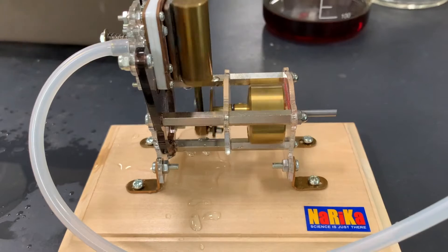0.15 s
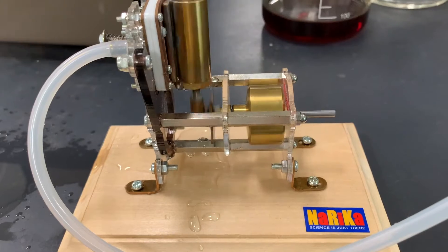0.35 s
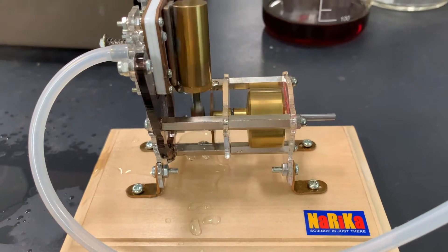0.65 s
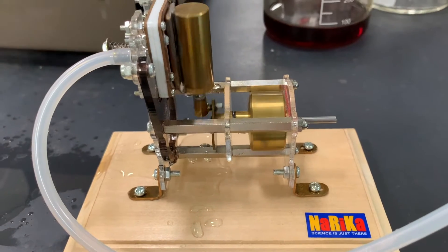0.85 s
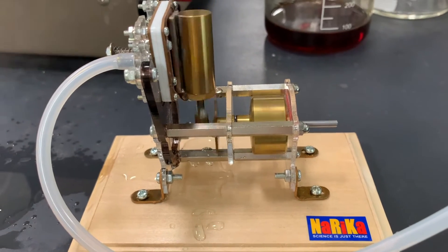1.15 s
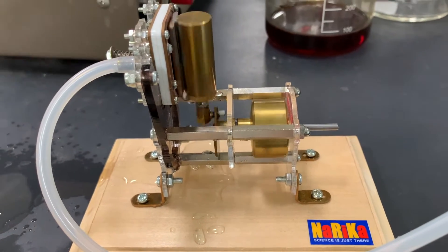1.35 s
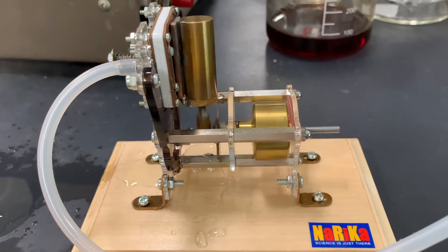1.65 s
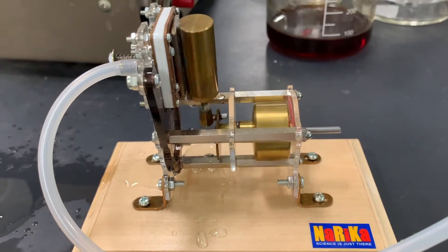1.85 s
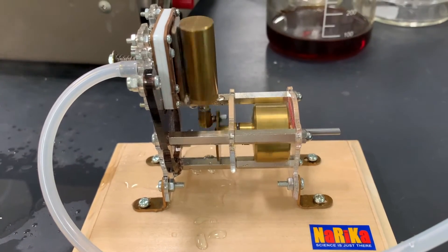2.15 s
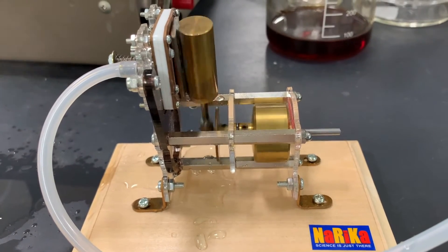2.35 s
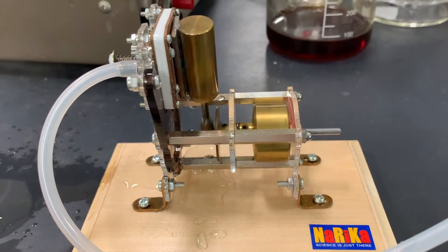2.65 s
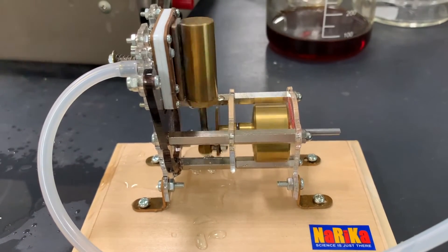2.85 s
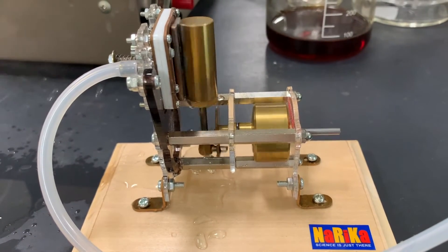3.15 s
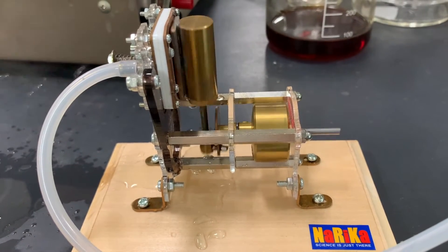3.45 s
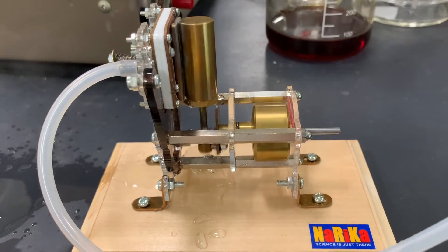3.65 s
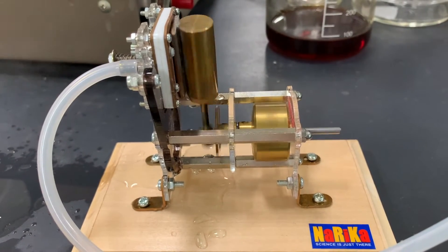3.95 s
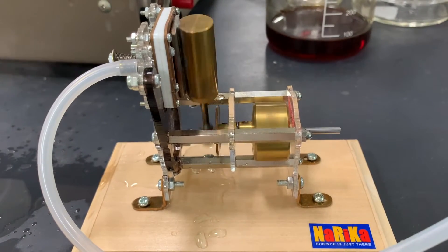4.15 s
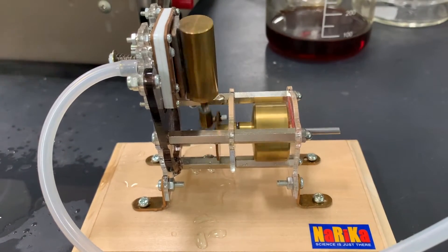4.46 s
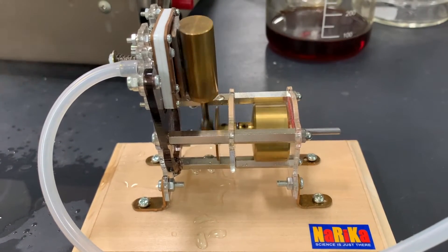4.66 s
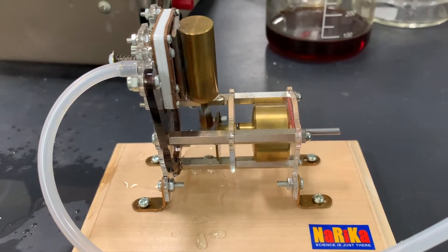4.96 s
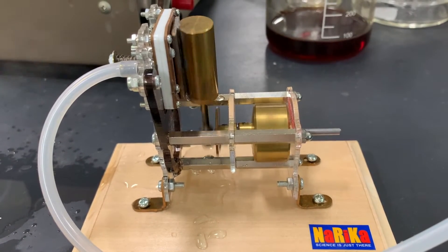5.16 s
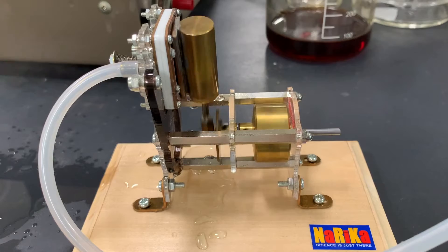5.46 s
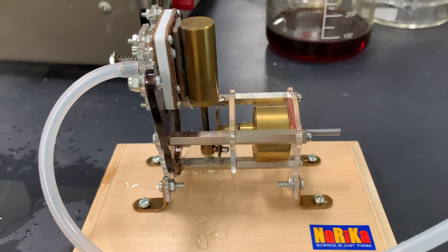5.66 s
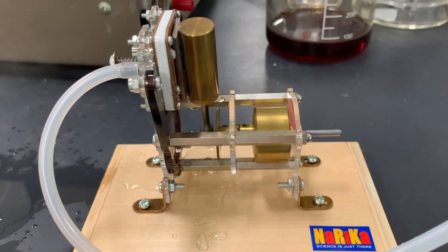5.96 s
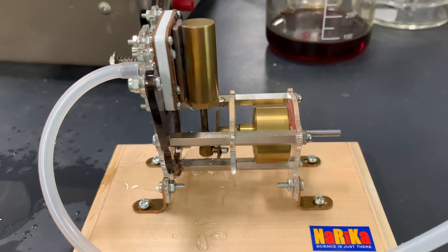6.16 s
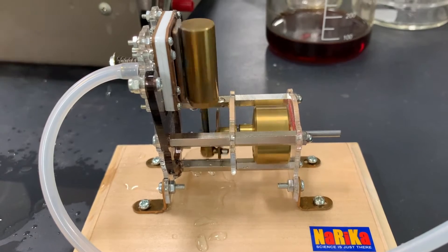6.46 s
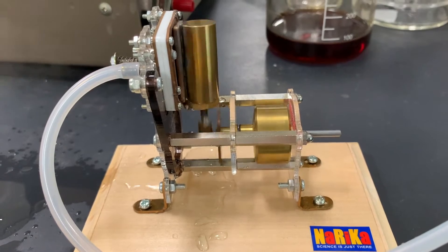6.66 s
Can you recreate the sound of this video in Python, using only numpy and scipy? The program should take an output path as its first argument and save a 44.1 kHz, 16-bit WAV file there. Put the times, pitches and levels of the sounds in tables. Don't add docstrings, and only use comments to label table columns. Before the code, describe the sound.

Steady, quick mechanical chatter from a tiny steam engine: bright metal ticks, dry low-mid knocks in frame and board, and thin whistling, spitting steam between them, alternating longer and shorter puffs. The pace stays nearly even while loudness and looseness shift from stroke to stroke. Recorded very near on a hard laboratory bench; short reflections, faint ventilation noise, no speech.

```python
import sys
import numpy as np
from scipy import signal
from scipy.fft import rfft, irfft
from scipy.io import wavfile
from scipy.ndimage import uniform_filter1d, map_coordinates

SR = 44100
rng = np.random.default_rng(int(sys.argv[2]) if len(sys.argv) > 2 else 0)


def attenuation_scalar(level_db):
    decades = np.asarray(level_db, float) / 20
    return 10 ** decades


def generate_wav(sig):
    pcm = np.round(np.clip(np.atleast_2d(sig).T, -1, 1) * 32767).astype(np.int16)
    wavfile.write(sys.argv[1], SR, pcm)


N = 300762
LEAD = SR // 10


def noise(*shape):
    return rng.standard_normal(shape)


def unit(x):
    return x / np.sqrt(np.mean(x ** 2))


def add(track, s, sound):
    i = LEAD + int(s * SR)
    track[..., i:i + sound.shape[-1]] += sound[..., :track.shape[-1] - i]


def walk(rate):
    k = int(SR / rate)
    steps = np.repeat(noise((N + LEAD) // k + 1), k)
    return uniform_filter1d(steps, k)[:N + LEAD]


def resonate(x, peaks, patchy_db=0):
    total = 0
    for hz, width, db in peaks:
        edges = [hz - width / 2, hz + width / 2]
        band = signal.sosfilt(signal.butter(2, edges, "band", fs=SR, output="sos"), x)
        total = total + band * attenuation_scalar(db + patchy_db * walk(30))
    return total


def ports(x, lag, unlike):
    n = x.shape[1]
    delay = np.exp(-2j * np.pi * np.arange(n // 2 + 1) / n * lag)
    left, right = x[0] + unlike * x[1], x[0] - unlike * x[1]
    return np.array([left, irfft(rfft(right) * delay, n)])


# (frequency [Hz], level per Hz [dB])
LAB_COLOUR = [(30, -6), (150, 1.5), (360, -5), (740, -12.5), (1500, -15), (2400, -21), (4400, -18),
              (6500, -35), (11000, -36), (13400, -31), (16500, -68.5)]
# (time [s], level [dB])
LAB_SWELL = [
    (0, -46),
    (.5, -45.5),
    (1.5, -52),
    (3.5, -56.5),
    (5, -56.5),
    (6.9, -52),
]


def lab():
    hz = np.arange((N + LEAD) // 2 + 1) * SR / (N + LEAD) + 1
    colour_hz, colour_db = np.transpose(LAB_COLOUR)
    colour = attenuation_scalar(np.interp(np.log(hz), np.log(colour_hz), colour_db))
    mid, side = rfft(noise(2, N + LEAD)) * colour
    side = side * np.clip(hz / 1200, .22, 1)
    hum = unit(irfft(np.array([mid + side, mid - side]), N + LEAD))
    swell_db = np.interp((np.arange(N + LEAD) - LEAD) / SR, *np.transpose(LAB_SWELL))
    return attenuation_scalar(swell_db) * hum


def room(engine):
    echo_db, t60_s = -5, 0.1459
    t = np.arange(SR // 2) / SR
    echo = noise(2, len(t)) * np.exp(-np.log(1000) * t / t60_s) * (t > .004)
    echo = echo * attenuation_scalar(echo_db) / np.sqrt(np.sum(echo ** 2) / 2)
    echo = signal.sosfilt(signal.butter(1, [280, 1500], "band", fs=SR, output="sos"), echo)
    return signal.fftconvolve(engine, echo, axes=1)[:, :N + LEAD]


CRANK_S = [-.4, .0434, .4847, .9735, 1.4704, 1.9524, 2.42, 2.871, 3.332, 3.8369, 4.3495, 4.8548, 5.3396,
           5.8237, 6.3052, 6.7711, 7.22]


def crank(down_turn, up_turn, usual, count=86):
    k = np.arange(count)
    even = np.linspace(CRANK_S[0], CRANK_S[-1], len(CRANK_S))
    place = 1 + ((k - 1) // 2 + np.where(k % 2, down_turn, up_turn)) / 3
    drift = map_coordinates(CRANK_S - even, [place])
    s = drift + even[0] + place * (even[1] - even[0])
    return np.column_stack([s, np.array(usual, float)[1 - k % 2]])


# (time [s], steam pressure [dB], wetness [dB], load on the pin [dB])
STEAM_FEED = [(0, 0, 1, 2), (.4, 0, 2, 1), (.7, 0, 3, 0), (1.3, -1, 4, 0), (1.7, -1, 0, 0), (2.1, -1, 2, 1),
              (2.45, 0, -4, -1), (2.75, 0, 2, 1), (3.1, 0, -4, 0), (3.5, -2, -1, -2), (3.8, 0, -7, 0),
              (4.2, 0, 1, -2), (4.5, 0, -3, 0), (5, 0, -1, 0), (5.55, -1, -6, -2), (6, -2, 1, 0),
              (6.3, -3, -3, 0), (6.8, 0, -2, -1)]


def feed(s, order):
    table = np.array(STEAM_FEED)
    return np.interp(s, table[:, 0], table[:, order])


# (whistle level [dB], time to its surge [ms], length [ms], spit against whistle [dB])
USUAL_PUFF = [
    (-47, 20.5, 24.5, -5),
    (-52, 5.5, 11, -3),
]
# (time [s], whistle level [dB], time to its surge [ms], length [ms])
GUSHES = [(.1367, -47, 5.5, 27), (.2828, -51, 7, 22.5), (.7269, -46.5, 22, 28.3), (.8276, -46.5, 8, 18.6),
          (.9961, -42.5, 11, 23.2), (1.0739, -49.5, 11.5, 23), (1.1651, -46, 11, 18.2),
          (1.2411, -61, 7.5, 10), (1.3299, -44.5, 13, 16.6), (1.4935, -46, 7, 24.7),
          (1.6561, -46.5, 9, 13.9), (1.816, -42, 5.3, 13.1), (1.9749, -45, 4.1, 17.1),
          (2.1351, -48, 13, 18), (2.592, -44, 22.5, 25.6), (3.0437, -45.5, 12, 16.2),
          (3.12, -49.5, .85, 26), (3.1991, -44.5, 11, 19.3), (3.861, -44.5, 23, 30.6),
          (4.1122, -50, 8.5, 27.4), (4.202, -44, 10, 18.4), (4.278, -54, 15.5, 27), (4.5439, -46, 12, 29.4),
          (4.629, -50, 4.2, 22), (4.7125, -43.5, 5, 15.8), (4.777, -48.5, -1, 30),
          (4.9435, -51.5, 15, 27.4), (5.0418, -47.5, 12, 22.8), (5.4406, -47, 2.9, 10.3),
          (6.248, -51.5, 13.5, 10)]
# (time [s], change in spit level [dB])
WATER_DROPS = [(.4294, 7), (1.3299, -8), (3.1991, 4), (3.3546, -5), (4.7125, 3), (4.8799, 3), (5.0418, 2),
               (1.7360, -8), (2.6667, 7), (2.8179, 3), (5.365, -4), (5.9268, 3), (6.089, 10)]


def puffs():
    rows = crank(.141, .633, USUAL_PUFF)
    rows[:, 1] += feed(rows[:, 0], order=1)
    rows[:, 4] += feed(rows[:, 0], order=2)
    rows[:, 1:] += noise(len(rows), 4) * [1.2, 1.5, 1.5, 1.8]
    for gush in GUSHES:
        rows[np.abs(rows[:, 0] - gush[0]).argmin(), :4] = gush
    for s, db in WATER_DROPS:
        rows[np.abs(rows[:, 0] - s).argmin(), 4] += db
    return rows


def puff_shape(hold_ms, fall_ms, surge_ms):
    t = np.arange(SR // 10) * 1000 / SR
    shape = np.minimum(t / 0.56, 1) * np.exp(-np.maximum(t - hold_ms, 0) / fall_ms)
    shape = shape * (1 + 0.45 * np.exp(-((t - surge_ms - 2) / 0.99) ** 2))
    return shape / np.sqrt(np.sum(shape ** 2) / SR / 0.0589)


# (frequency [Hz], width [Hz], level [dB])
WHISTLE_BANDS = [(7264, 667, -19.5), (8204, 510, -9.5), (10720, 1870, -15), (12836, 668, -1),
                 (13796, 498, -2), (15500, 550, -23)]
# (frequency [Hz], width [Hz], level [dB])
SPIT_BANDS = [(2590, 685, 5.5), (3395, 480, 7.5), (4362, 393, 9.5), (5251, 627, 0.5)]


def steam():
    flow, wet = np.zeros(N + LEAD), np.zeros(N + LEAD)
    for s, db, surge, length, spit_db in puffs():
        tail = 5.84 + 1.35 * max(length - surge, 0)
        add(flow, s - .002, attenuation_scalar(db - 1.5) * puff_shape(surge + 2, tail, surge))
        add(wet, s - .002, attenuation_scalar(db + spit_db - 0.5) * puff_shape(length, 7.0, surge))
    sputter = unit(attenuation_scalar(2.69 * walk(300)))
    whistle = unit(resonate(noise(2, N + LEAD), WHISTLE_BANDS, patchy_db=3.0)) * flow * sputter
    spit = unit(resonate(noise(2, N + LEAD), SPIT_BANDS, patchy_db=4.2)) * wet * sputter
    return ports(whistle, lag=-13.2, unlike=.12) + ports(spit, lag=-13.2, unlike=.6)


# (frequency [Hz], width [Hz], level [dB])
TICK_BANDS = [(1332, 880, 13.5), (3884, 3570, 3), (8100, 2630, -0.5), (9920, 1190, 4), (13520, 620, 5)]


def ticks(contacts):
    out, t = np.zeros((2, N + LEAD)), np.arange(SR // 100) / SR
    shape = (1 - np.exp(-t / 0.00148)) * np.exp(-t / 0.00228)
    for s, db in contacts:
        add(out, s, attenuation_scalar(db + 3.5) * noise(2, len(t)) * shape)
    return ports(resonate(out, TICK_BANDS), lag=-12.0, unlike=0.57)


# (time [s], level [dB])
STRAYS = [
    (1.2185, -44),
    (1.5404, -34),
    (2.823, -35),
    (3.1384, -40),
    (3.1544, -40),
    (3.4625, -42),
]


def stray_ticks():
    return ticks(STRAYS)


# (tick level [dB], knock level [dB], knock start [ms], knock middle [ms], bass share [dB])
USUAL_RATTLE = [
    (-38, -37, 6.1, 16, -6),
    (-38, -35.5, 9.6, 21.5, -3.5),
]
# (time [s], tick level [dB], knock level [dB], bass share [dB])
DOWN_BLOWS = [(.0434, -30, -34.5, -8), (.19, -31.5, -33, -2.5), (.8042, -25, -31, -10),
              (.9735, -45, -31, -26), (1.1398, -28, -31, -10), (1.4704, -34, -31.5, -10),
              (1.9524, -29, -30.5, -33), (2.7217, -32, -36, -15), (3.4944, -31.5, -32.5, -15.5),
              (3.6652, -37, -34, -37), (3.8369, -33, -32, -11), (4.0094, -30, -32, -13),
              (4.1789, -32, -32, -24.5), (4.3495, -35, -34, -23.5), (4.5216, -33.5, -33, -22),
              (4.6902, -29, -32, -34), (4.8548, -28, -32, -9.5), (5.0177, -31, -31, -15.5),
              (5.1793, -36, -34, -28.5), (5.5016, -28, -33, -10), (5.8237, -33, -33.5, -6.5)]
# (time [s], tick level [dB], knock level [dB], knock middle [ms])
UP_BLOWS = [(.4145, -25.5, -30.5, 10.5), (.7192, -52.5, -31, 20.4), (.8919, -27, -27, 9.9),
            (1.0618, -29, -28, 9), (1.2279, -25, -28.5, 8.5), (1.3927, -38.5, -32.5, 15.6),
            (1.5575, -31, -27.5, 9.7), (1.7187, -30.5, -27.5, 8.9), (2.0375, -35.5, -30.5, 14.5),
            (2.1941, -30, -28.5, 11.2), (2.348, -37.5, -27.5, 9.3), (2.501, -38.5, -28, 7.7),
            (2.6516, -30.5, -28, 8.4), (3.104, -29, -29, 11), (3.2573, -37.5, -32, 17.1),
            (3.9295, -29.5, -29, 11.4), (4.2658, -38.5, -31.5, 20.2), (4.4356, -37.5, -34, 20),
            (4.6111, -32, -27.5, 8.8), (4.7684, -37, -28.5, 17.7), (4.9368, -39.5, -34.5, 23.4),
            (5.103, -29.5, -31, 11), (5.2644, -44.5, -29, 10.5), (5.5868, -31, -28.5, 8.9),
            (6.2309, -39.5, -32.5, 17.8), (6.7007, -39, -31.5, 14.3)]


def strokes():
    rows = crank(0, .533, USUAL_RATTLE)
    rows = np.column_stack([rows, np.ones(len(rows))])
    rows[:, 1:3] += feed(rows[:, :1], order=3)
    for s, tick_db, db, bass_db in DOWN_BLOWS:
        rows[np.abs(rows[:, 0] - s).argmin()] = s, tick_db, db, 3.4, 8.2, bass_db, 0
    for s, tick_db, db, middle in UP_BLOWS:
        rows[np.abs(rows[:, 0] - s).argmin()] = s, tick_db, db, middle - 6.0, middle, -3, 0
    return rows


def bounces(middle_ms, loose, count=90):
    when, size, face = rng.random((3, count))
    centre = max(middle_ms - 5.5, .5) / 1000
    when = np.clip(np.abs(centre + 3.2 * loose * (when - .55)), 0, .06)
    when[0] = 0
    side = np.cos(np.pi * face * min(160 * loose, 1))
    size = side * attenuation_scalar(-2.2 * np.log(size + 0.012))
    push = np.zeros(SR // 16)
    np.add.at(push, (when * SR).astype(int), size / np.sqrt(np.sum(size ** 2)))
    return push


# (frequency [Hz], time to fade by 60 dB [s], level on a down stroke [dB],
# level on an up stroke [dB], lead of the left side [radians])
BODY_TONES = [(152.1, 0.1282, -15, -10.5, .1), (232.6, 0.1005, -11, -20.5, 0.9),
              (261.33, 0.0869, -8.5, -1.5, 0.133), (290.68, 0.083, -13.5, 0, 0.42),
              (376.66, 0.1102, -5, -3.5, 0.79), (434.24, 0.0483, 4.5, 3, 0.304),
              (469.95, 0.0419, -38.5, -7, 1.77), (617.3, 0.0733, -9, -6.5, 0.55),
              (733.05, 0.0428, -3.5, -6, 1.083), (760.34, 0.029, 0, 2, 0.654),
              (889.2, 0.0592, -11, -2.5, 1.607), (941.2, 0.0264, -13, -3, 0.5),
              (1043.7, 0.0621, -8.5, -9, 2.26), (1404.7, 0.02, -0.5, -0.5, 2.35),
              (1434, 0.022, -3, 1.5, 1.646), (1506.5, 0.135, -13.5, -14.5, 2.421),
              (2020, 0.01333, 3, 0, 3.661), (2278, 0.0145, -12, -15.5, 5.77),
              (2626.6, 0.0542, -15.5, -21, 5.07), (3560, 0.0553, -66, -14, 4.37),
              (4301, 0.032, -38, -31, 2.96)]


def ring_body(push, loose, up, bass_db):
    t = np.arange(SR // 10) / SR
    hz, t60, down_db, up_db, lead = np.transpose(BODY_TONES)[:, :, None]
    fade = np.exp(-np.log(1000) * t / (0.7343 * t60)) * (1 - np.exp(-t * hz / 2.47))
    own_hz = hz * (1 + .035 * (rng.random(hz.shape) - .5))
    gain_db = (up_db if up else down_db) + (hz < 330) * (bass_db + (4.0 if up else 10.5))
    gain_db = gain_db - 250 * loose * np.log2(np.maximum(hz / 800, 1))
    hits = np.flatnonzero(push)
    share = np.abs(np.exp(-2j * np.pi * own_hz * hits / SR) @ push[hits])[:, None]
    ring = attenuation_scalar(gain_db) / np.sqrt(share ** 2 + 0.334) * fade
    left, right = [(ring * np.sin(2 * np.pi * own_hz * t + side * lead / 2)).sum(axis=0) for side in (1, -1)]
    return signal.fftconvolve(np.array([left, right]), push[None])


# (frequency [Hz], width [Hz], level [dB])
GRIT_BANDS = [(1434, 718, -3.5), (2439, 630, -4.5), (4252, 2267, -12.5), (6944, 7500, -21.5),
              (9714, 1700, -18), (13830, 533, -14)]


def grating(scrape):
    grit = signal.lfilter([1], [1, -.985], scrape) * noise(2, N + LEAD)
    return attenuation_scalar(-3.0) * ports(resonate(grit, GRIT_BANDS), lag=10.09, unlike=0.888)


def knocks():
    out, scrape = np.zeros((2, N + LEAD)), np.zeros(N + LEAD)
    for k, (s, _, db, onset, middle, bass_db, rattles) in enumerate(strokes()):
        up = k % 2 == 0
        db = db + rattles * 2.5 * (rng.random() - .5)
        middle = middle + rattles * 4.5 * (rng.random() - .5)
        loose = max(middle - onset - 3.3, .4) / 1000
        push = bounces(middle, loose)
        sound = ring_body(push, loose, up, bass_db)
        loudness = np.sqrt(np.sum(sound.mean(axis=0) ** 2) / SR / 0.0261)
        add(out, s, sound * attenuation_scalar(db - 2.6752) / loudness)
        add(scrape, s, np.abs(push) * attenuation_scalar(db + (2.0 if up else -1.0)))
    return out + grating(scrape)


def scene():
    engine = steam() + ticks(strokes()[:, :2]) + knocks()
    return (lab() + room(engine) + stray_ticks() + engine)[:, LEAD:]


def low_pass(x):
    return signal.sosfilt(signal.butter(12, 16600, fs=SR, output="sos"), x)


def record(dry):
    x = signal.sosfilt(signal.butter(1, 35, "high", fs=SR, output="sos"), dry)
    x = signal.sosfilt(signal.butter(1, 120, "high", fs=SR, output="sos"), x)
    x = signal.sosfilt(signal.butter(8, 15700, fs=SR, output="sos"), x)
    mix = x * attenuation_scalar(np.array([[.3], [-.3]]))
    return low_pass(mix)


dry = scene()
out = record(dry)
generate_wav(out)
```